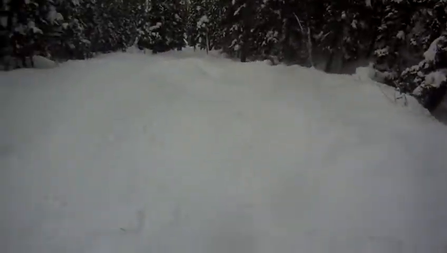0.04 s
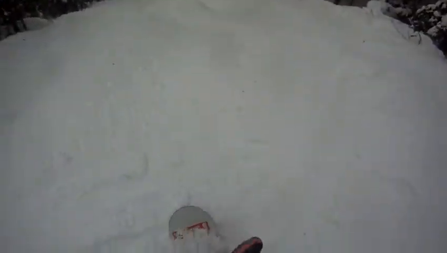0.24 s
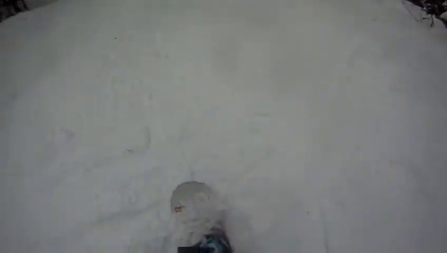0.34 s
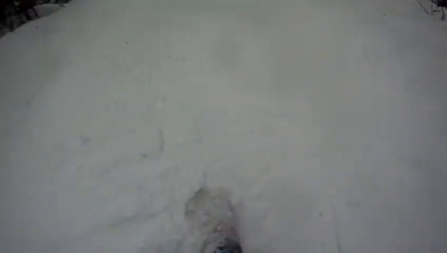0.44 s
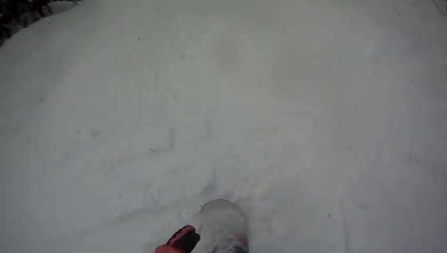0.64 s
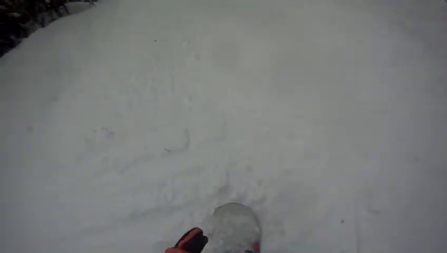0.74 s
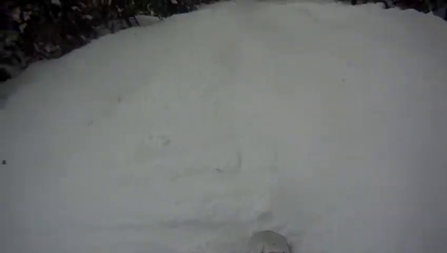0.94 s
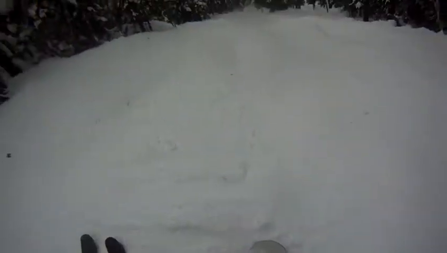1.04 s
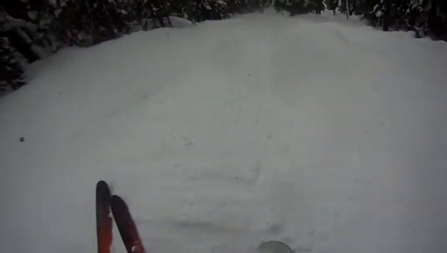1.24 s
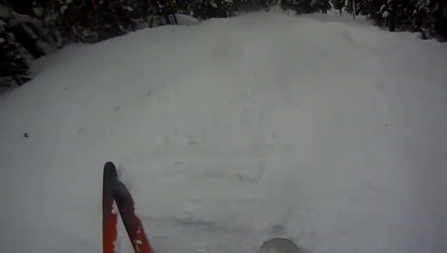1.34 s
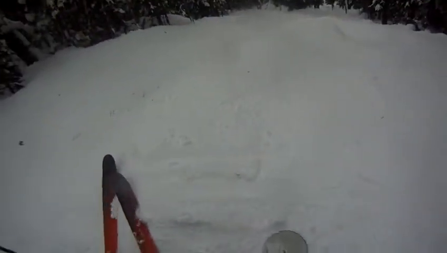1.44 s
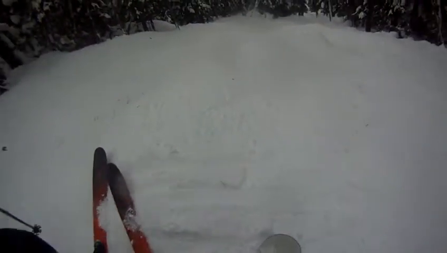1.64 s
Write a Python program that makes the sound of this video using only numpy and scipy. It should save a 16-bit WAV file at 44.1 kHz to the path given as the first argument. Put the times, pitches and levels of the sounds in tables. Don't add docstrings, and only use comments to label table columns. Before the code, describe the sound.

Snow sliding under a board, boxy and coarse through a body-worn microphone in a plastic case. Scraping hiss and sharp ticks open, growing into abrupt crunchy strokes from 0.2 to 0.5 s, with a deep thump near 0.34 s. It fades after 0.6 s to thin glide over low wind rumble; a small bump at 0.9 s, hard clicks and brief scrapes around 1.3 s, then faint ticks.

```python
import sys
import numpy as np
from scipy import signal
from scipy.fft import rfft, irfft
from scipy.io import wavfile

SR = 44100
rng = np.random.default_rng(int(sys.argv[2]) if len(sys.argv) > 2 else 0)


def nominal_scale(level):
    x = np.asarray(level, float) / 20
    return 10 ** x


def wav_out(sig):
    wavfile.write(sys.argv[1], SR, np.round(np.clip(np.atleast_2d(sig).T, -1, 1) * 32767).astype(np.int16))


N = 74970


def rms_one(x):
    return x / np.sqrt(np.mean(x ** 2) + 1e-20)


def in_time(rows):
    return np.interp(np.arange(N) / SR, *np.transpose(rows))


def bell(s, rise_s, fall_s):
    t = np.arange(N) / SR
    return np.exp(-((t - s) / np.where(t < s, rise_s, fall_s)) ** 2 / 2)


def drift(hz):
    r = np.exp(-2 * np.pi * hz / SR)
    return rms_one(signal.lfilter([1], [1, -2 * r, r * r], rng.standard_normal(N + SR))[SR:])


def resonate(x, hz, width_hz):
    r = np.exp(-np.pi * width_hz / SR)
    poles = [1, -2 * r * np.cos(2 * np.pi * hz / SR), r * r]
    return signal.lfilter([(1 - r * r) / 2, 0, (r * r - 1) / 2], poles, x + 1e-18)


def case(x, level_db, tilt_db, widen, patch_db=0):
    # f/Hz, width/Hz, level/dB
    resonances = [(920, 33, -12.5), (1368, 173, 0), (1773, 353, -3.5), (1973, 281, -1), (2271, 186, -0.9),
                  (2885, 140, -11.5), (3323, 270, -12.5), (3643, 225, -12), (4240, 67, -16.5),
                  (5050, 790, -21.5), (5360, 25, -40)]
    out = 0
    for k, (hz, width_hz, db) in enumerate(resonances):
        drive_db = level_db + db + tilt_db * np.log2(max(hz, 1400) / 2000)
        if patch_db:
            drive_db = drive_db + patch_db * drift(45)
        out = out + (-1) ** k * resonate(x * nominal_scale(drive_db), hz, width_hz * widen)
    return out


def grains(clump_db):
    grains_per_s, spread_db, clump_hz = 2500, 3, 136
    sizes = nominal_scale(spread_db * np.minimum(rng.exponential(1, N), 5)) * rng.choice([-1, 1], N)
    hits = sizes * (rng.random(N) < grains_per_s / SR)
    x = rms_one(hits) + 0.72 * rng.standard_normal(N)
    x = x * nominal_scale(clump_db * drift(clump_hz))
    return x / np.std(case(x, 0, 0, 1))


def slide():
    # start t/s, end t/s, start level/dB, end level/dB, brightness/dB per octave
    strokes = [(0.0, 0.172, -57.5, -51.5, 2), (0.18, 0.262, -49.5, -44, 5.5),
               (0.287, 0.319, -45, -40.5, 1.5), (0.32, 0.41, -51.5, -41, 6.5), (0.42, 0.497, -39, -42, 6),
               (0.523, 0.622, -48, -47.5, 5.5), (0.636, 0.664, -61, -51, 5), (0.96, 1.053, -59, -61.5, 3.5),
               (1.106, 1.191, -63.5, -54, 3), (1.296, 1.326, -48, -66, -8), (1.349, 1.39, -50.5, -53.5, -7),
               (1.483, 1.55, -60, -62, -7), (1.612, 1.652, -65, -64, 11.5)]
    # t/s, level/dB
    glide = [(0.0, -52), (0.416, -51), (0.458, -52.5), (0.624, -56.5), (0.78, -59), (1.438, -56.5),
             (1.7, -59)]
    attack_s, release_s, patch_db = 0.0039, 0.0062, 2.0
    t = np.arange(N) / SR
    level_db, tilt_db = np.full(N, -120.), np.zeros(N)
    for start, end, first_db, last_db, bright_db in strokes:
        edge = np.minimum((t - start) / attack_s + 1, (end - t) / release_s + 1)
        db = np.interp(t, [start, end], [first_db, last_db])
        db = db + 20 * np.log10(np.clip(edge, 1e-6, 1))
        tilt_db = np.where(db > level_db, bright_db, tilt_db)
        level_db = np.maximum(db, level_db)
    spray = case(grains(1.5), level_db, tilt_db, 0.88, patch_db)
    return spray + case(grains(-0.1), in_time(glide), 0, 0.83, patch_db)


def rumble():
    # f/Hz, density/dB per Hz
    spectrum = [(12, 7.5), (20, -1), (80, -26.5), (129, -15), (308, -16), (340, -19), (396, -16.5),
                (1100, -27), (1430, -106), (2420, -120)]
    # t/s, level/dB
    buffet = [(0.0, -61), (0.354, -60.5), (0.562, -64), (0.928, -62.5), (1.168, -58), (1.7, -62.5)]
    gain_db, lump_db, lump_hz = 2.5, 2.5, 45
    hz = np.maximum(np.fft.rfftfreq(N, 1 / SR), 1)
    table_hz, table_db = np.transpose(spectrum)
    shape_db = np.interp(np.log(hz), np.log(table_hz), table_db, left=-60, right=-80)
    noise = irfft(rfft(rng.standard_normal(N)) * nominal_scale(shape_db), N)
    return rms_one(noise) * nominal_scale(in_time(buffet) + gain_db + lump_db * drift(lump_hz))


def mount_shake():
    # t/s, level/dB
    shake = [(0, -57), (.2, -59), (.55, -62.5), (.75, -76), (.87, -60.5), (1.0, -68), (1.13, -60.5),
             (1.35, -65.5), (1.5, -71), (1.58, -67), (1.66, -58)]
    mount_hz = 58.7
    tremble = resonate(resonate(rng.standard_normal(N), mount_hz, 49), mount_hz, 48)
    return nominal_scale(in_time(shake)) * rms_one(tremble)


def ticks():
    # t/s, peak level/dB, brightness/dB per octave
    tick_table = [(0.0094, -36, -21), (0.0443, -35.5, 8.5), (0.09, -38.5, -1), (0.152, -27.5, 2.5),
                  (0.3093, -24.5, -12), (0.4098, -27, -25), (0.6105, -41, -4), (0.9371, -43.5, -20),
                  (1.0006, -46, -21), (1.258, -41.5, -16), (1.279, -45, 4), (1.2836, -27.5, -12.5),
                  (1.333, -28.5, -2.5), (1.3879, -37, -16), (1.4376, -45, 8), (1.4871, -42, -10),
                  (1.5417, -41.5, -14), (1.5713, -43, -19), (1.6643, -40.5, -24), (1.6874, -52, -15)]
    tick_s, chatter_hz, size = .0016, 1420, 256
    crackle_share, noise_share, snap_height = .12, .9, .2
    n, out = np.arange(size) / SR, np.zeros(N + SR)
    shape = n / tick_s * np.exp(-n / tick_s * 2)
    chatter = np.sin(2 * np.pi * chatter_hz * n)
    snap = snap_height * (np.arange(size) == 20)
    for s, db, bright_db in tick_table:
        crackle = noise_share * rng.standard_normal(size) + chatter
        drive = shape * crackle_share * crackle + snap
        hit = case(np.pad(drive, (0, 2048)), 0, bright_db, 2.1)
        i = int(s * SR)
        out[i:i + len(hit)] += hit / np.abs(hit).max() * nominal_scale(db)
    return signal.sosfilt(signal.butter(3, 950, "high", fs=SR, output="sos"), out[:N])


def scratches():
    # start t/s, length/s, level/dB, f/Hz, width/Hz
    scratch_table = [(.231, .0057, -50, 3600, 500), (.4, .17, -61.5, 860, 45), (.43, .077, -58, 950, 170),
                     (.44, .04, -48, 2700, 49), (.011, .107, -62.5, 975, 17), (.151, .008, -48, 1000, 150),
                     (.175, .04, -65, 720, 150), (.24, .012, -55, 4300, 400), (1.001, .007, -52, 3410, 350),
                     (1.283, .005, -41, 1850, 500), (1.333, .005, -42, 1950, 600),
                     (1.333, .006, -50, 950, 300), (1.349, .026, -56, 3500, 210),
                     (1.352, .022, -65, 4970, 900), (1.365, .03, -61, 520, 150),
                     (1.507, .03, -60, 3500, 400), (1.535, .02, -62, 620, 200),
                     (1.628, .018, -56, 3780, 300), (1.657, .016, -61, 780, 180)]
    t, out = np.arange(N) / SR, 0
    for s, length_s, db, hz, width_hz in scratch_table:
        noise = rng.standard_normal(N)
        tone = rms_one(resonate(resonate(noise, hz, width_hz), hz, 2 * width_hz))
        swell = np.sin(np.pi * np.clip((t - s) / length_s, 0, 1)) ** .5
        out = out + nominal_scale(db) * tone * swell
    return out


def snaps():
    # peak t/s, level/dB, f/Hz
    snap_table = [(0.053, -44, 1600), (.102, -49, 1600), (0.122, -43, 1800), (.186, -49, 4800),
                  (0.19, -42, 1700), (0.221, -46, 1500), (0.235, -44, 2200), (0.2417, -41, 3650),
                  (0.2463, -39, 2800), (0.2485, -38, 2250), (0.263, -42, 2200), (0.2644, -47, 3500),
                  (.2918, -39, 1500), (0.2976, -48, 3500), (0.2997, -47, 1450), (0.305, -44, 3550),
                  (0.308, -36, 2300), (.312, -38, 3500), (.3145, -36, 1700), (.338, -41, 2150),
                  (0.343, -37, 2150), (0.358, -40, 3450), (.362, -36, 2200), (0.3653, -40, 3500),
                  (0.3765, -38, 3500), (.3809, -46, 5150), (0.389, -44, 3550), (0.3877, -38, 2300),
                  (0.419, -42, 2200), (0.4315, -30.5, 2250), (0.4325, -47, 3550), (0.4385, -27.5, 2200),
                  (.4515, -55, 4950), (0.452, -33, 2250), (0.4593, -40, 3450), (.4595, -34.5, 1450),
                  (0.4635, -42, 1950), (.4709, -39, 3300), (0.4707, -35, 1450), (.4724, -34, 2300),
                  (.4772, -35.5, 3400), (0.4813, -39, 2050), (0.4866, -40, 3350), (0.4897, -39.5, 5050),
                  (0.4916, -34, 1700), (0.49, -44, 2300), (.4959, -41, 3500), (0.496, -37, 2050),
                  (0.5236, -50, 3650), (.5325, -43, 2050), (0.544, -52, 2350), (1.2827, -39, 2200),
                  (1.292, -47, 1450), (1.3372, -38, 2400), (1.335, -45, 3500), (1.352, -47, 2300),
                  (1.36, -54, 1500), (1.372, -47.5, 2300), (1.393, -45, 1500)]
    rise_s, fall_s, rough_db, rough_hz = .001, .002, 2, 580
    t, out = np.arange(N) / SR, 0
    for s, db, hz in snap_table:
        ring = np.sin(2 * np.pi * hz * t + rng.uniform(0, 2 * np.pi))
        out = out + nominal_scale(db) * ring * bell(s, rise_s, fall_s)
    return out * nominal_scale(rough_db * drift(rough_hz))


def thumps():
    # biggest swing t/s, signed height (full scale 1), f/Hz, rise/s, fall/s
    thump_table = [(0.08, .003, 58, .012, .02), (0.2985, -.006, 70, .004, .005),
                   (0.405, .005, 125, .008, .01), (0.195, .004, 65, .01, .012),
                   (0.252, -.007, 18, .02, .015), (0.312, .016, 18, .01, .012),
                   (0.3388, -.098, 63, .009, .013), (0.348, -.022, 25, .005, .006),
                   (0.364, .03, 50, .008, .012), (0.393, -.017, 45, .008, .008),
                   (0.4125, -.02, 62, .008, .012), (0.43, .007, 18, .012, .012),
                   (0.462, -.009, 20, .012, .015), (0.901, -.005, 28, .006, .008),
                   (0.914, .009, 60, .006, .03), (1.414, -.013, 58, .009, .014),
                   (1.439, .006, 55, .008, .01), (1.571, -.003, 25, .01, .012)]
    push_share, push_s = .15, .006
    t, out = np.arange(N) / SR, 0
    for s, height, hz, rise_s, fall_s in thump_table:
        swing = np.cos(2 * np.pi * hz * (t - s)) * bell(s, rise_s, fall_s)
        out = out + height * (swing + push_share * bell(s, push_s, push_s))
    return out


def knocks():
    # t/s, peak level/dB
    knock_table = [
        (.289, -45.5),
        (0.2923, -45),
        (0.2998, -49.5),
        (1.098, -57.5),
        (1.172, -56.5),
        (1.268, -55),
        (1.377, -56.5),
    ]
    # f/Hz, width/Hz, level/dB
    body = [(252, 69, 2.5), (332.5, 83, 3), (496, 116, 0), (667, 104, 2)]
    knock_s, gain_db, push, crunch = .002, 2, .09, .25
    t, force = np.arange(N) / SR, 0
    for s, db in knock_table:
        force = force + nominal_scale(db + gain_db) * (t > s) * np.exp(-np.abs(t - s) / knock_s)
    rough = force * (push + crunch * rng.standard_normal((len(body), N)))
    drives = rough + 4.2 * np.maximum(np.diff(rough, prepend=0), 0) * 0 + 4.2 * onset(force, rough)
    out = 0
    for drive, (hz, width_hz, db) in zip(drives, body):
        out = out + nominal_scale(db + 25.0) * resonate(resonate(drive, hz, width_hz), hz, 3.7 * width_hz)
    return out


def onset(force, rough):
    return np.maximum(np.diff(force, prepend=0), 0)


def scene():
    sliding = slide() + scratches() + snaps()
    gear = ticks() + mount_shake() + thumps() + knocks()
    return (sliding + gear + rumble())[None]


def roll_off(x):
    return signal.sosfilt(signal.butter(12, 16260, fs=SR, output="sos"), x)


def record(dry):
    self_noise_db, antialias_hz = -60, 5340
    x = dry[0] + nominal_scale(self_noise_db) * rng.standard_normal(N)
    x = signal.sosfilt(signal.butter(10, antialias_hz, fs=SR, output="sos"), x)
    sampled = signal.resample(x, N * 12000 // SR)
    held = signal.resample(np.repeat(sampled, 4), N)
    steep = signal.sosfiltfilt(signal.ellip(8, .2, 30, 15330, fs=SR, output="sos"), held)
    gentle = signal.sosfiltfilt(signal.butter(14, 15700, fs=SR, output="sos"), held)
    mix = .86 * steep + .14 * gentle
    return roll_off(mix[None])


dry = scene()
out = record(dry)
wav_out(out)
```